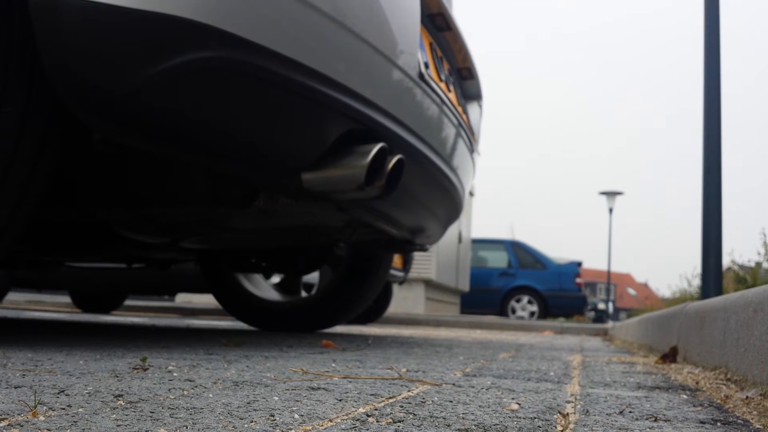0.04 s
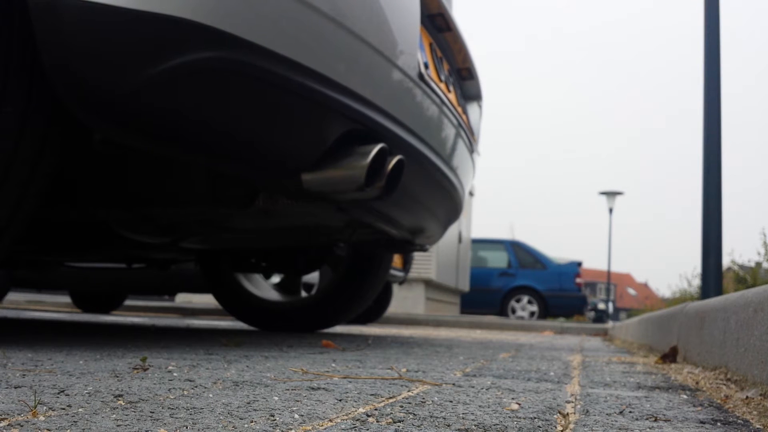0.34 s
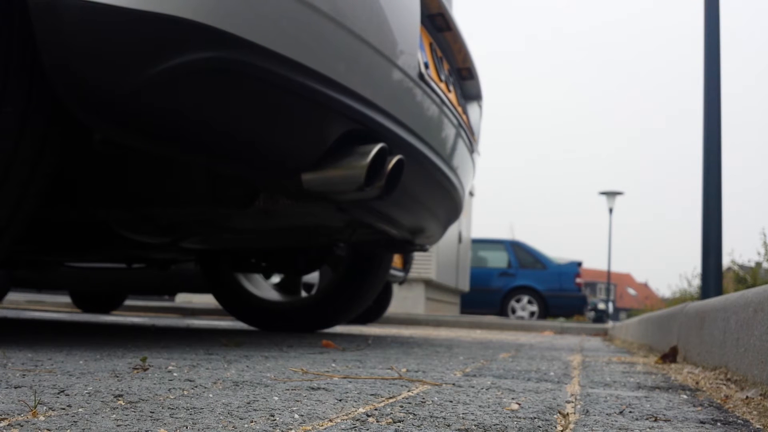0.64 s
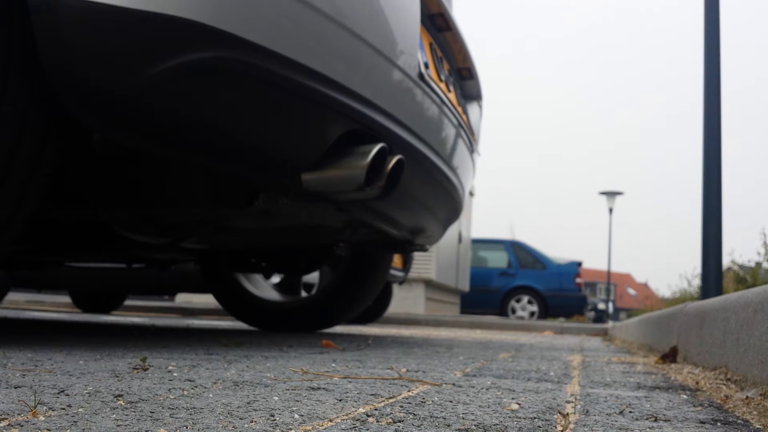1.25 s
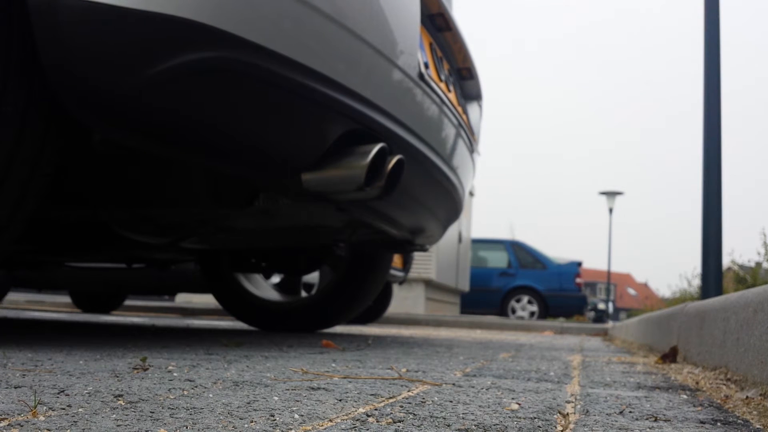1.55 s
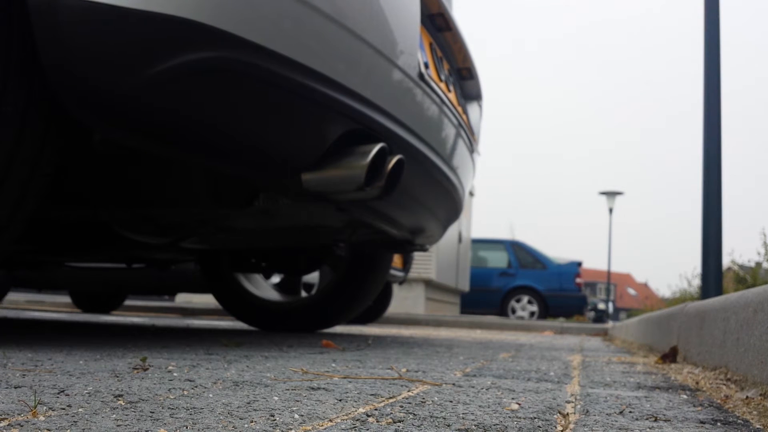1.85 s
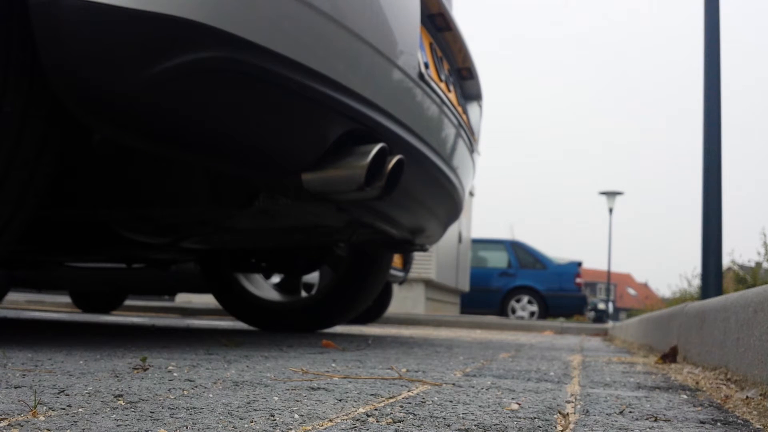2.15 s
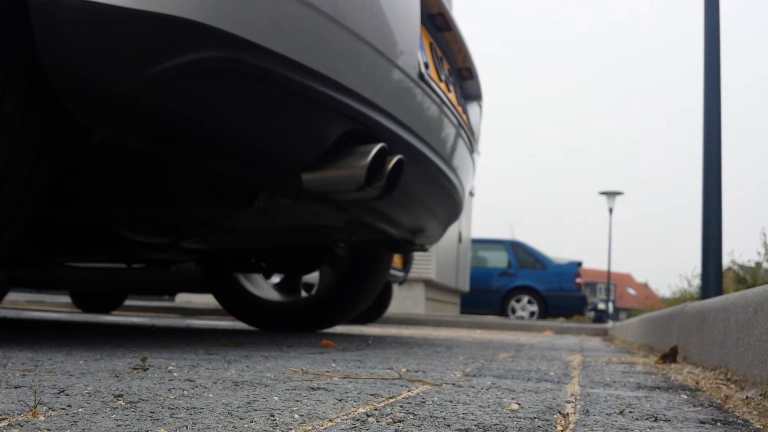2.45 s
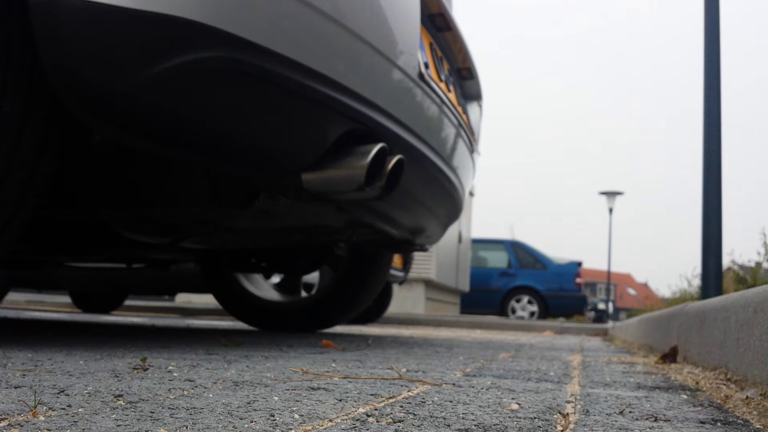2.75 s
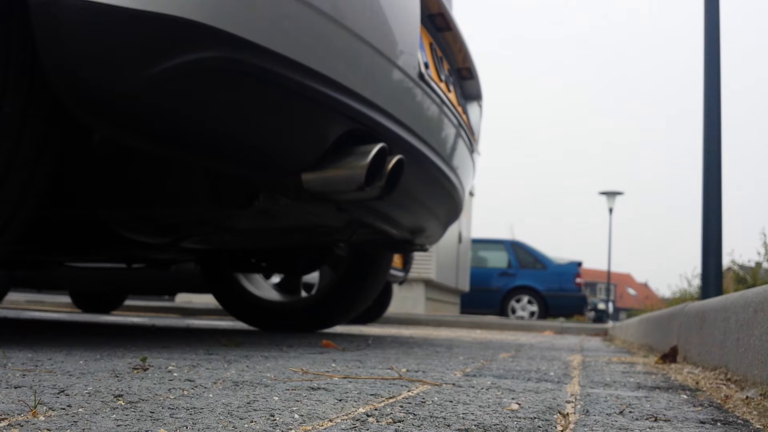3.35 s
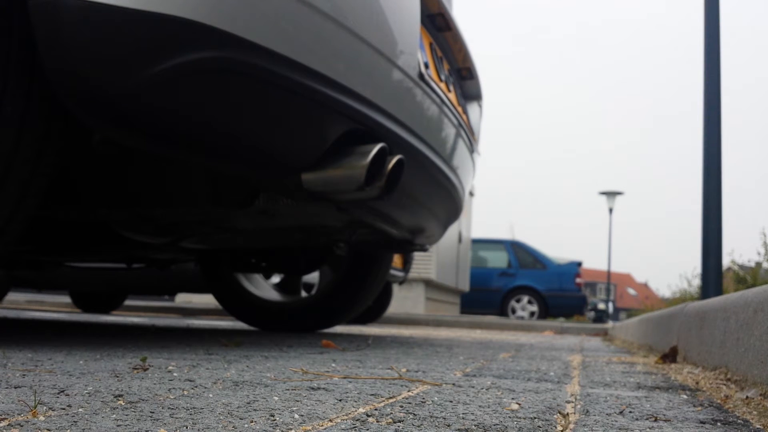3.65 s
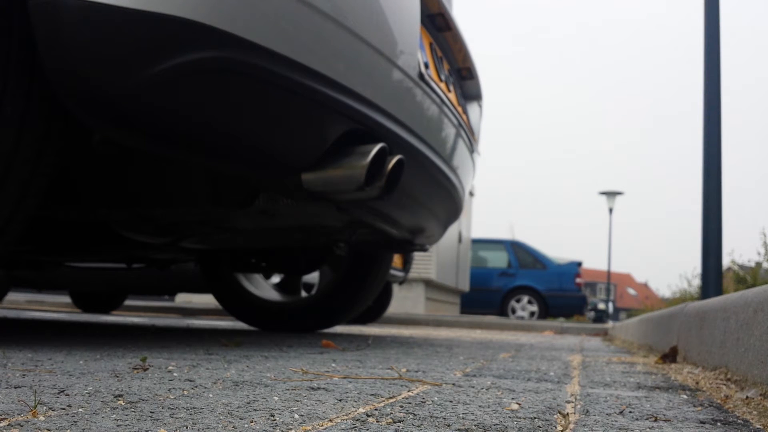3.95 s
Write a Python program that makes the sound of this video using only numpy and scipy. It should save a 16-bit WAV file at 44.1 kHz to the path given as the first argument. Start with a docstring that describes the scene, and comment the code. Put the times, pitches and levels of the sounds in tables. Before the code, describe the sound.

A car engine starts: the starter grinds briefly, the engine catches, races a little and settles into a fast, droning idle with a few tailpipe knocks. Heard outdoors, low to the paving just behind the exhaust.

```python
"""A car starting from cold

A four-cylinder car, heard from the paving just behind its twin tailpipes. The starter's gear teeth
grind and clank; the engine catches, races, stumbles once and settles into a fast idle. Each firing
(one burn of fuel) makes the exhaust boom, drone and bark and lets out a rasping puff of gas.
The tailpipe knocks now and then; the engine bay hisses and briefly whistles."""
import sys
import numpy as np
from scipy import signal
from scipy.fft import rfft, irfft
from scipy.io import wavfile

SR = 44100
rng = np.random.default_rng(int(sys.argv[2]) if len(sys.argv) > 2 else 0)


def generate_wav(sig):
    """Save sig (samples, or channels by samples) to the path in sys.argv[1] as 16-bit PCM at SR."""
    pcm = np.round(np.clip(np.atleast_2d(sig).T, -1, 1) * 32767).astype(np.int16)
    wavfile.write(sys.argv[1], SR, pcm)


N = 176400
TIME = np.arange(N) / SR

# engine speed: t/s, firing rate/Hz
FIRING_RATE = [(0.208, 17.11), (0.27, 27.62), (0.33, 41.02), (0.4, 45.53), (0.5, 51.08), (0.62, 49.54),
               (0.78, 48.77), (1.0, 50.13), (1.18, 48.93), (1.32, 44.27), (1.48, 46.49), (1.78, 44.68),
               (2.05, 43.47), (2.25, 41.83), (2.6, 43.09), (3.1, 42.41), (3.5, 42.62), (4.0, 42.26)]
# ringing notes of the starter's housing: f/Hz, width/Hz, level/dB
HOUSING_NOTES = [(2180, 87, -7), (2430, 53, 0.5), (3156, 39, -4.5), (3730, 250, -10.5), (4530, 72, -7.5),
                 (4770, 41, -9.5)]


def exhaust(times):
    """Each firing rings the silencer and pipe and pushes a puff of swirling gas out of the tailpipes."""
    # strength of the firings: t/s, boom/dB, drone/dB, bark/dB, rasp/dB
    effort = [(.2, -6, -7.5, -8.5, 4.5), (.29, 0.5, 1.5, 8, 5.5), (.4, -5, 2.5, -3, -4),
              (.6, -3.5, 0, -2.5, -0.5), (.85, -4.5, 0, -8, -2.5), (1.25, -4.5, -2, -4, -2.5),
              (1.5, -1.5, -1, 0, -1.5), (2.05, -4, -1.5, -2, -2), (2.2, -3.5, -1, 3, 1.5),
              (2.6, -2, 0, 1.5, 1.5), (4, -3.5, 0.5, 1, 0)]
    # cylinders in firing order: boom/dB, drone/dB, bark/dB, rasp/dB, drone lag/ms,
    # then the drone's echo where their pipes join: delay/ms, level/dB
    cylinders = [(1.5, 3.7, 0, -1.5, -.9, 9.4, -8.3), (.5, 1, -6.2, 2.5, -1.4, 8.9, -8.6),
                 (1.55, 1, -1.5, 1, -1.1, 12.8, -9.4), (1.3, 5, 6.5, .5, -1.3, 11, -10)]
    # weak burns of the stumble: t/s, change in boom/dB
    misfires = [(1.286, -7), (1.308, -3), (1.33, -12), (1.353, -4), (1.375, -1.5)]
    # firings that spit: t/s, extra rasp/dB
    spits = [(.455, 9), (.572, 9), (.692, 9.5), (2.444, 7), (2.655, 6), (3.003, 6), (3.285, 5), (3.59, 6),
             (3.731, 11)]
    # ringing notes of silencer (boom), pipe (drone) and tailpipe (bark): f/Hz, width/Hz, level/dB
    boom_notes = [(43, 140, -18), (85.2, 17.5, 5.5), (99.4, 10.4, 1), (174.5, 29.3, 0.5)]
    drone_notes = [(258.9, 26.7, 1), (301.6, 15, 2.5), (315.6, 6.8, -3), (283, 19, -1), (355, 8.4, -11)]
    bark_notes = [(411, 36, 3.5), (546, 9.7, 11.5), (597.4, 13, 3.5), (700, 280, -6.5), (901, 57, 0.5)]
    chance = rng.standard_normal((len(times), 5)).T  # no two firings are quite alike
    times = times + .00008 * chance[0]
    cylinder = np.array(cylinders)[np.arange(len(times)) % len(cylinders)].T
    lag, echo_delay = cylinder[4:6] / 1000
    echo_db = cylinder[6]
    stumble_db = np.outer([1, .58, .43, .5], on_nearest_firing(times, misfires))
    scatter_db = np.array([.4, .9, 1, 1.6])[:, None] * chance[1:]
    boom_db, drone_db, bark_db, rasp_db = curve(effort, times) + cylinder[:4] + stumble_db + scatter_db
    gas_push = TIME * np.exp(-TIME / .00073)
    boom = unit(resonate(convolve(clicks(times, boom_db), gas_push), boom_notes))
    pipe_kicks = clicks(times + lag, drone_db) + clicks(times + lag + echo_delay, drone_db + echo_db)
    drone = unit(resonate(pipe_kicks, drone_notes))
    cracks = clicks(times, bark_db) + clicks(times + .0098, bark_db - 7)  # each with its pipe echo
    bark = unit(resonate(cracks, bark_notes))
    silencer = signal.ellip(4, 1, 18, 878, fs=SR, output="sos")  # muffles above 878 Hz
    pulses = signal.sosfilt(silencer, amp(-9.5) * boom - amp(-17.5) * drone + amp(-31) * bark)
    spurts = clicks(times, rasp_db + on_nearest_firing(times, spits))
    return tailpipe_rasp(spurts) + amp(-31.5) * gas_chuff(cracks) - pulses


def puffs(kicks):
    """The gas flow after each kick: a quick rise, a quick fall and a weak, longer tail."""
    rise = 1 - np.exp(-TIME / .0003)
    fall = np.exp(-TIME / .0019) + .15 * np.exp(-TIME / .031)
    return convolve(kicks, rise * fall)


def tailpipe_rasp(spurts):
    """Escaping gas rasps and the tailpipe knocks; both echo under the car."""
    # tone of the rasp: f/Hz, level/dB
    rasp_tone = [(400, -31), (850, -5), (1000, -10), (1170, 5.5), (1380, -4.5), (1600, -5), (2100, -24.5),
                 (2600, -10.5), (3400, -20.5), (4600, -28), (9000, -38.5), (12000, -55.5)]
    # knocks of the tailpipe: t/s, level/dB
    knocks = [(0.693, 11), (2.862, -5), (3.004, 11), (3.287, 18), (3.591, 24.5), (3.733, 12), (3.779, 12)]
    # notes they ring: f/Hz, width/Hz, level/dB
    knock_notes = [(1210, 45, 4.5), (1180, 40, 1.5), (1570, 120, -22), (2760, 200, -26)]
    gas = unit(colour(puffs(spurts) * noise(channels=1), rasp_tone))[0]
    knocking = resonate(clicks(*np.array(knocks).T), knock_notes)
    direct = amp(-30.5) * gas + knocking
    delayed = np.interp(TIME - .00042, TIME, direct)  # reaches the right side later
    return np.array([direct, delayed]) + amp(-13.5) * under_car(direct)


def gas_chuff(cracks):
    """The lower, breathy noise of each puff of gas."""
    # tone of the chuff: f/Hz, level/dB
    chuff_tone = [(200, -26), (420, -1), (560, -0.5), (680, -8.5), (870, -2), (950, -22.5), (1040, -21),
                  (1170, -7), (1500, -20), (3000, -31), (9000, -65.5)]
    swirl = noise(channels=1) + .34 * noise()
    return unit(colour(puffs(cracks) * swirl, chuff_tone))


def starter():
    """Gear teeth grind and chatter on the engine's flywheel and ring the housing until it runs free."""
    # strength of the grinding: t/s, level/dB
    strength = [(0, -19.5), (.018, -25.5), (.026, -27), (.088, -31), (.098, -24), (.182, -21), (.21, -27.5),
                (.27, -23.5), (.33, -25), (.38, -26.5), (.44, -33), (.455, -26), (.49, -41), (.6, -71)]
    # how often teeth meet: t/s, rate/Hz
    tooth_rate = [(0, 364.5), (.07, 350.2), (.1, 446.4), (.15, 406.2), (.2, 383.8), (.3, 522), (.5, 599.7)]
    # tone of the grinding: f/Hz, level/dB
    grind_tone = [(30, -15), (65, -3), (200, -17.5), (420, -5), (600, -9.5), (830, 1.5), (1300, -4.5),
                  (1750, -4.5), (2400, -0.5), (3150, -2.5), (3500, -12), (4800, -10), (6500, -13),
                  (10000, -26.5), (12000, -42)]
    times = cycle_times(curve(tooth_rate), 0)
    chance = rng.standard_normal((len(times), 2)).T
    teeth = unit(clicks(times + .00012 * chance[0], db=3 * chance[1]))
    contact = amp(.5) * under_car(teeth) + amp(1.5) * under_car(noise())
    drive = contact * amp(curve(strength) + 1.27 * wander(hz=52))
    # each housing note flickers on its own
    housing = sum(resonate(drive * amp(2 * wander(hz=45)), [note]) for note in HOUSING_NOTES)
    # divide out how much each filter changes the level of plain noise
    grind = colour(drive, grind_tone) / np.std(colour(noise(), grind_tone))
    housing /= np.std(resonate(noise(), HOUSING_NOTES))
    return grind + amp(-9.5) * housing


def starter_clanks():
    """Each blow of the gear cracks and rings the housing; harder contact favours the higher notes."""
    # blows of the gear: t/s, level/dB, brightness/(dB per octave)
    blows = [(.003, -25, -1), (.036, -26, 15), (.1, -19, -3), (.121, -23.5, -18), (0.134, -26.5, -16),
             (.152, -31.5, -8), (0.164, -31, 6), (0.177, -24, 17), (0.236, -18.5, 4), (.256, -27, 0),
             (.27, -17, 13), (0.301, -23.5, -4), (.328, -17.5, 5), (.349, -18, 1), (.361, -22.5, -6),
             (.399, -26, -3), (.452, -29, -3)]
    hz, width, note_db = np.array(HOUSING_NOTES).T[:, :, None]
    age = TIME[:SR // 20]
    out = np.zeros((2, N))
    for start, db, brightness in blows:
        phase = 2 * np.pi * rng.random((2, len(hz), 1))
        gain = amp(note_db + brightness * np.log2(hz / hz[1]))
        notes = gain * np.exp(-np.pi * width * age) * np.sin(2 * np.pi * hz * age + phase)
        crack = amp(-20) * rng.standard_normal((2, len(age))) * np.exp(-age / .004)
        out += convolve(clicks(np.array([start]), db), .53 * unit(notes.sum(axis=1)) + crack)
    return out


def engine_bay(times):
    """Belts and air intake hiss and valves tick twice a firing, heard along the underside of the car."""
    # tone of the hiss: f/Hz, level/dB
    hiss_tone = [(300, 4), (1000, -2), (1700, -1), (2450, 1.5), (3100, -1.5), (3500, -7), (3800, -5),
                 (4050, -8), (4500, -2), (5300, -8), (6100, -7), (7000, -9), (8500, -16), (10200, -23),
                 (11500, -40)]
    # its strength: t/s, level/dB
    strength = [(0, -36), (.3, -31.5), (.6, -34), (.9, -35.5), (1.3, -37.5), (1.7, -36.5), (2.3, -32.5),
                (4, -32.5)]
    ticks = cycle_times(2 * curve(FIRING_RATE), times[0])
    ticking = unit(clicks(ticks, db=3 * rng.standard_normal(len(ticks))))
    hiss = under_car(noise() + amp(-10.5) * ticking)
    return unit(colour(hiss, hiss_tone)) * amp(curve(strength))


def intake_whistle():
    """Air drawn into the engine whistles unsteadily, then sinks and fades as the throttle closes."""
    # course of the whistle: t/s, f/Hz, level/dB, overtone level/dB
    course = [(.42, 2560, -50, -80), (.53, 2690, -35, -62), (.555, 2760, -29, -36), (.58, 2780, -34, -31),
              (.63, 2780, -44, -52), (.7, 2690, -38, -75), (.78, 2620, -48, -80), (.95, 2480, -42, -80),
              (1.12, 2420, -41, -80), (1.25, 2420, -51, -80), (1.45, 2400, -74, -90)]
    hz, db, overtone_db = curve(course)
    wavering_hz = hz + 38 * wander(hz=90) + 150 * noise()
    phase = 2 * np.pi * np.cumsum(wavering_hz, axis=1) / SR
    flutter_db = 4.5 * wander(hz=60)
    return amp(db + flutter_db) * np.sin(phase) + amp(overtone_db) * np.sin(2.09 * phase)


def under_car(x, fade_s=.0045):
    """Many quick echoes between the car's floor and the paving, different on each side."""
    echoes = noise() * np.exp(-TIME / fade_s)
    return convolve(x, echoes[:, :SR // 10] / np.sqrt(np.sum(echoes ** 2) / 2))


def amp(db):
    """Turn decibels into a multiplier."""
    return 10 ** (np.asarray(db) / 20)


def unit(x):
    """Scale a sound to an average power of 1."""
    return x / np.sqrt(np.mean(x ** 2))


def curve(table, at=TIME):
    """Join a table's rows by straight lines over time."""
    key, *columns = np.array(table, float).T
    return np.squeeze([np.interp(at, key, column) for column in columns])


def noise(channels=2):
    """Separate white noise in each channel."""
    return rng.standard_normal((channels, N))


def wander(hz):
    """A random wobble of typical size 1, mostly slower than hz."""
    return unit(signal.sosfilt(signal.butter(2, hz, fs=SR, output="sos"), noise(channels=1)[0]))


def clicks(times, db):
    """One click at each time, shared between two samples."""
    out = np.zeros(N + 2)
    at = np.clip(times * SR, 0, N)
    np.add.at(out, at.astype(int), amp(db) * (1 - at % 1))
    np.add.at(out, at.astype(int) + 1, amp(db) * (at % 1))
    return out[:N]


def cycle_times(rate, start):
    """Times at which something running at this rate comes round."""
    turns = np.cumsum(rate) / SR
    return np.interp(np.arange(np.interp(start, TIME, turns), turns[-1]), turns, TIME)


def on_nearest_firing(times, events):
    """Give each event's decibels to the firing closest in time."""
    return sum(db * (np.arange(len(times)) == np.argmin(abs(times - t))) for t, db in events)


def convolve(x, response):
    """Let every sample of a sound set off a copy of the response."""
    return signal.fftconvolve(np.atleast_2d(x), np.atleast_2d(response), axes=1)[:, :N]


def resonate(x, notes):
    """Let a sound ring a set of notes; narrower ones ring longer."""
    return sum(amp(db) * signal.lfilter(*signal.iirpeak(hz, hz / width, fs=SR), x)
               for hz, width, db in notes)


def colour(x, tone, size=16384):
    """Turn each frequency up or down as the tone table says."""
    hz, db = np.array(tone, float).T
    gain = amp(np.interp(np.log(np.fft.rfftfreq(size, 1 / SR) + 1), np.log(hz), db))
    # build the filter so that it never sounds ahead of its input
    cepstrum = irfft(np.log(gain)) * (1 + np.sign(size / 2 - np.arange(size)))
    cepstrum[0] /= 2
    return convolve(x, irfft(np.exp(rfft(cepstrum))))


def scene():
    """Exhaust close by, starter and engine at the far end of the car."""
    times = cycle_times(curve(FIRING_RATE), start=.2075)
    return exhaust(times) + engine_bay(times) + starter() + starter_clanks() + intake_whistle()


def record(dry):
    """Each microphone has its own tone; the loudest peaks are rounded and the highest treble is cut."""
    # left side compared with right: f/Hz, level/dB
    balance = [(60, 0), (200, -.2), (360, -.8), (650, -2.5), (1180, 4.5), (1900, 7), (2500, -2), (3800, 8),
               (4700, 0), (7000, -4), (8500, -10)]
    ceiling, top_hz = .95, 12000
    hz, db = np.array(balance).T
    left_lead_db = np.interp(np.log(np.fft.rfftfreq(2 * N, 1 / SR) + 1), np.log(hz), db)
    side_gains = amp(np.array([left_lead_db, -left_lead_db]) / 2)
    heard = irfft(rfft(dry, 2 * N) * side_gains)[:, :N]
    rounded = heard / (1 + (heard / ceiling) ** 8) ** (1 / 8)
    return signal.sosfilt(signal.ellip(8, .2, 70, top_hz, fs=SR, output="sos"), rounded)


dry = scene()
out = record(dry)
generate_wav(out)
```